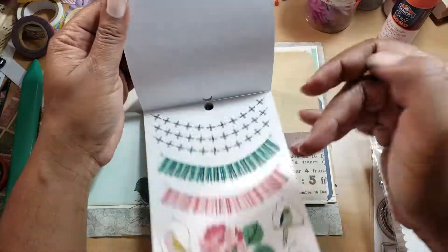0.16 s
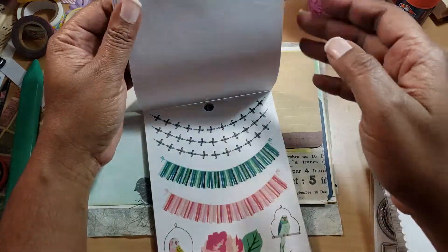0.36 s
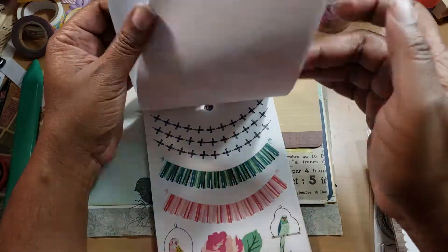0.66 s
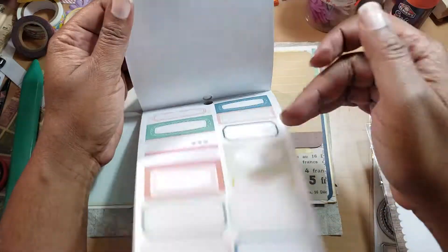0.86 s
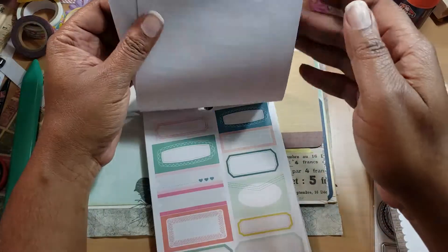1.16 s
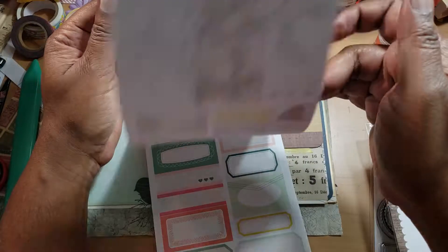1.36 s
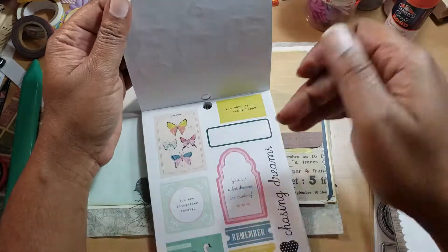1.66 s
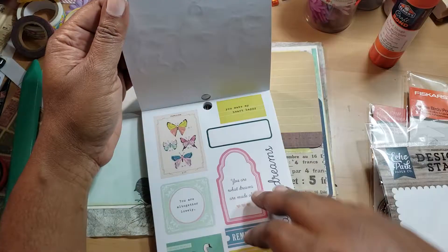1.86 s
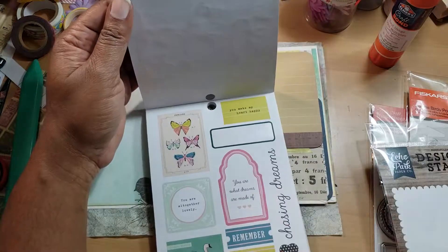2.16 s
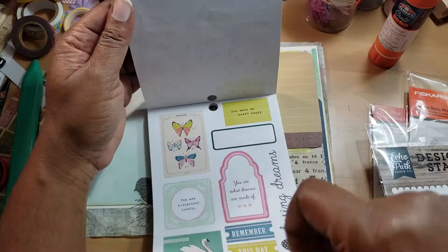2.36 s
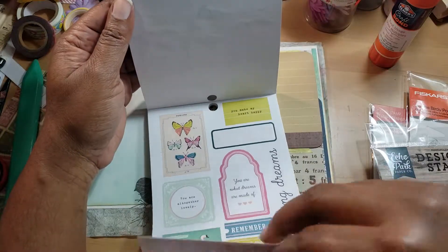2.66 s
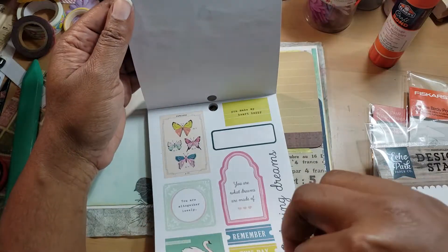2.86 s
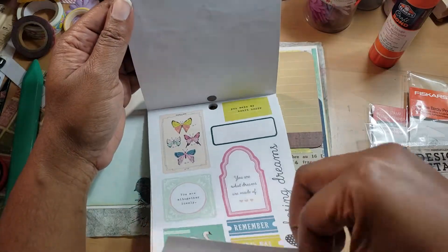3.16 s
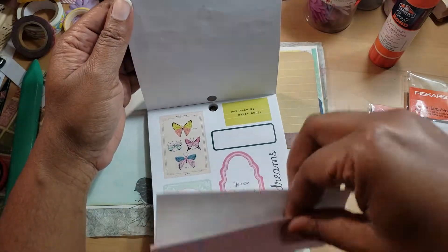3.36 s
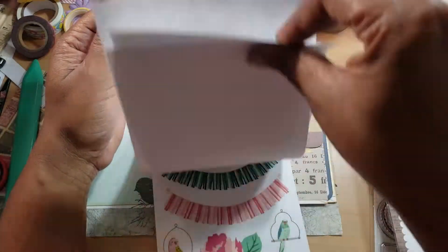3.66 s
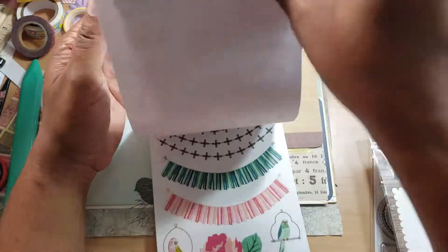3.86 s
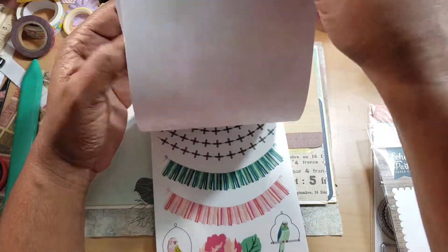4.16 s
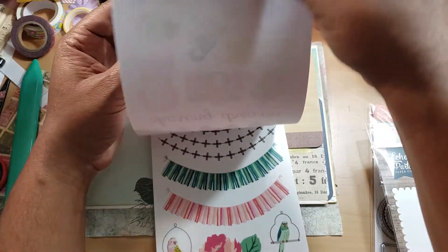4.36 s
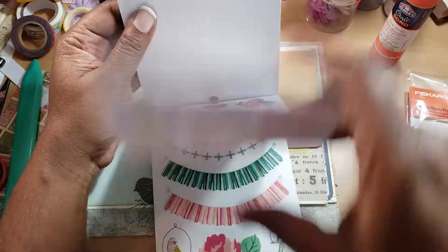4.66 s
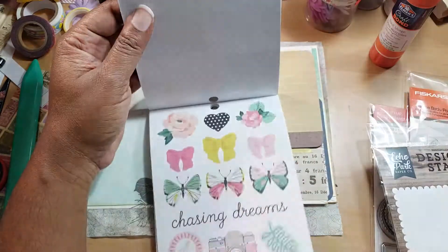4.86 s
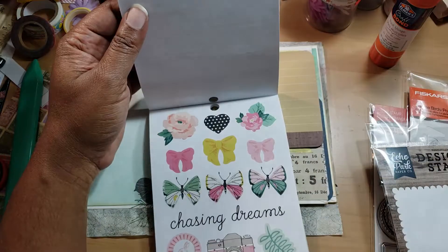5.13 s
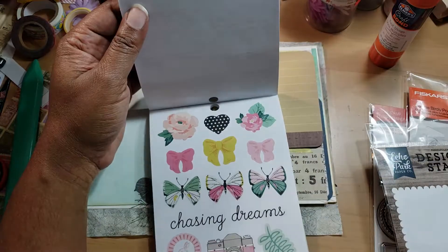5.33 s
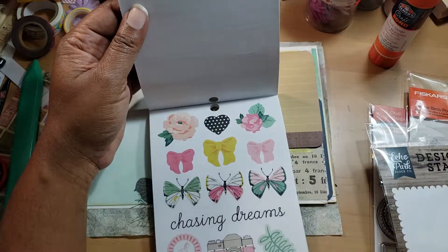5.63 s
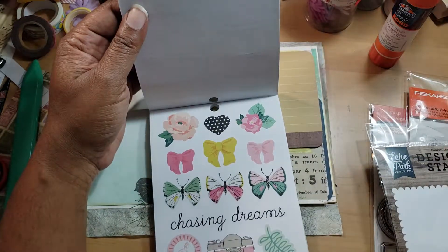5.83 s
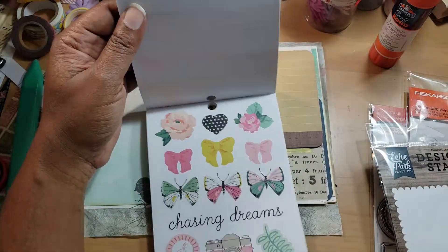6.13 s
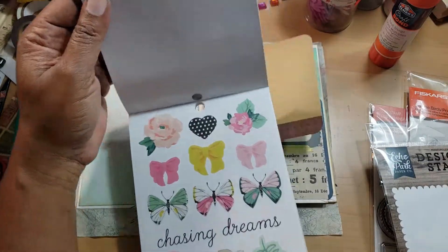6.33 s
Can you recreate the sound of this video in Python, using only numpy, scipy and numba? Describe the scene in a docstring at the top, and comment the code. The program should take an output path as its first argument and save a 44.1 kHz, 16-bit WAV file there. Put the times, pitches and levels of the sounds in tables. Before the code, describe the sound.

In a small room with a steady low hum, someone leafs through a pad of sticker sheets. Brief papery swishes and ticks come first, followed by louder rubbing and crisp snaps as a sheet buckles. Another page rustles over and pats down, and the handling thins to a few light brushes. The paper sounds close and fairly dry, with a faint microphone hiss on the left.

```python
"""Pages of a sticker book are flipped by hand at a craft desk, close to two microphones.
Sheets slip from under a thumb, are rubbed apart, lifted and turned: stick-slip friction of the fibres
drives the resonances of the paper and the air beneath it. Sheets snap as they buckle and pat down on
the pad. A motor hums in the small, rumbling room, and a thin microphone hiss sits on the left."""
import sys
import numpy as np
from scipy import signal
from scipy.fft import rfft, irfft, next_fast_len
from scipy.io import wavfile
from numba import njit

SR = 44100
rng = np.random.default_rng(int(sys.argv[2]) if len(sys.argv) > 2 else 0)


def log_audio(samples):
    """Write samples as a 16-bit WAV file to the path given in sys.argv[1]."""
    # one column per channel
    frames = np.atleast_2d(samples).T
    # limit to full scale, then quantise
    limited = np.clip(frames, -1, 1)
    pcm = np.round(limited * 32767).astype(np.int16)
    wavfile.write(sys.argv[1], SR, pcm)


N = 286517

# Motor turning rate, mains and their octaves: pitch_hz
HUM_PITCHES = [56.85, 59.3, 113.7, 119.95]
# Strength of those tones: rms_db
HUM_LEVELS = [-53, -64.5, -62.5, -66]
# Spectra of room rumble and microphone hiss: frequency_hz, relative_density_db
RUMBLE_SPECTRUM = [(20, -19), (35, -19), (43, 0), (60, 1), (80, 2.5), (100, 3), (122, -4.5), (140, -10.5),
                   (200, -17.5), (300, -20), (450, -36), (900, -39), (2000, -52.5)]
LEFT_HISS_SPECTRUM = [(300, -29), (550, -19), (850, -18), (1200, -17), (1600, -12), (2100, -2.5), (2500, 0),
                      (2950, -4.5), (3500, -19.5), (5000, -27), (6400, -15.5), (7800, -33), (10000, -92)]
EVEN_HISS_SPECTRUM = [(300, 4), (1000, -2), (3000, -2.5), (5500, -6.5), (8700, -17), (10000, -12),
                      (11500, -2.5), (16000, -3)]
# Likeness of the two microphone signals: frequency_hz, coherence (capped at 1 in use)
RUMBLE_COHERENCE = [(60, 1), (130, 1), (280, 0.55), (700, 0.34)]
ROOM_COHERENCE = [(300, 0.87), (1000, 0), (2500, 0)]
PAPER_COHERENCE = [(300, 0.8), (1200, 1.2), (2200, 0.7), (4500, 0.14), (8000, 0.1), (16000, 0)]
# Level difference between the microphones: frequency_hz, left_minus_right_db
RUMBLE_PAN = [(60, -2), (130, -5.5), (280, -2.5), (500, -0.5)]
PAPER_PAN = [(300, 0), (600, 4), (1300, 0), (2000, 3.5), (3000, 4), (4500, 1), (6500, -4), (9000, -6.5),
             (12000, -15.5), (16000, -7)]
# Peaks and dips that the desk top gives to the rubbing: centre_hz, width_hz, gain_db
DESK_RESPONSE = [(960, 29, -2), (1320, 41, 1), (1375, 240, -1), (1598, 17, -4), (2430, 560, -2),
                 (2796, 44, 1), (2937, 30, -1.5), (3460, 22, -2), (4000, 72, 0.5), (4860, 36, 2),
                 (5500, 72, -0.5)]
# Pats of page and fingers on the pad: start_s, relative_level_db, centre_hz, thud_offset_db, t60_s
PAD_IMPACTS = [(0.048, -52, 650, -8, 0.042), (0.082, -57.5, 700, -1, 0.09), (0.308, -68, 490, 3.5, 0.042),
               (0.942, -57, 597, -21, 0.07), (0.953, -53, 527, -26, 0.093),
               (1.141, -45.5, 1390, -10.5, 0.1), (1.253, -54.5, 1340, -21, 0.15),
               (1.595, -57.5, 536, -13, 0.078), (1.629, -61, 680, 0.5, 0.059),
               (2.649, -53.5, 600, -12, .12), (3.033, -43.5, 1140, -18, 0.053),
               (3.054, -45.5, 990, -40, 0.08), (4.176, -52.5, 1400, -10, 0.07),
               (4.689, -54, 1230, -12, 0.073), (4.704, -50, 1130, -8, 0.061),
               (4.731, -48.5, 1140, -14, 0.11), (4.794, -55, 1160, -17, 0.042),
               (4.832, -47.5, 576, -11.5, 0.062), (4.937, -67, 544, -7, 0.07),
               (5.007, -61, 1400, -8, 0.062)]
# A sheet buckles or leaves a finger: start_s, relative_level_db, centre_hz, width_ratio, treble_db
SHEET_SNAPS = [(0.077, -38, 2280, 0.58, -4), (0.788, -33, 2660, 0.64, -7), (1.0444, -28, 2200, 1.3, -8),
               (1.405, -37, 3000, .8, -10), (1.69, -48.5, 2180, 0.59, -20), (2.606, -22.5, 1800, .3, -21),
               (2.608, -22.5, 1050, .7, -24), (2.648, -29, 1150, .42, -29), (2.871, -42, 1660, 0.45, -21),
               (2.899, -32.5, 1650, .8, -22), (3.037, -31, 1880, 0.76, -25),
               (3.051, -26.5, 1790, 0.14, -24), (3.056, -30, 1110, 0.44, -24), (3.816, -45, 2600, 1.4, -11),
               (4.104, -36, 1760, 0.34, -22), (4.218, -38, 2130, .6, -19), (4.457, -39, 4570, .9, -24),
               (4.69, -47.5, 1150, .9, -18), (4.736, -37, 1190, 0.5, -12), (4.828, -42.5, 1400, .8, -20)]
# Spectrum of the sheet in each grip: frequency_hz, relative_density_db
SLIP_SPECTRUM = [(290, -34), (500, -18.5), (613, -19), (678, -16), (784, -14.5), (1190, -19), (1320, -0.5),
                 (1480, -3), (1770, -5.5), (2100, 1.5), (3200, -7), (4470, -6), (8580, -16), (12100, -12),
                 (16000, -9.5)]
SEPARATE_SPECTRUM = [(240, -62), (400, -26.5), (636, -16.5), (777, -7), (935, -7.5), (994, -0.5),
                     (1440, -6.5), (1730, -1), (2470, -7.5), (3020, -8), (4510, -9.5), (4950, -9),
                     (9610, -23), (11900, -21), (16000, -21)]
TUG_SPECTRUM = [(180, -45), (300, -23), (502, -24.5), (555, -23), (689, -13), (1120, -1), (1480, -4),
                (1870, -10), (2650, -1), (3190, -1.5), (4670, -4.5), (5800, -4), (7690, -15.5),
                (12500, -19.5), (16000, -18)]
LIFT_SPECTRUM = [(290, -71), (500, -42), (1020, -4.5), (1140, -10), (1230, -6.5), (2040, -3), (2330, -8.5),
                 (2500, -8.5), (3250, -7), (5020, 0.5), (5630, -3), (6420, -5.5), (9360, -18.5),
                 (11600, -17.5), (16000, -19)]
TURN_SPECTRUM = [(290, -54), (500, -29.5), (698, -21.5), (988, -11), (1280, -7.5), (1820, -4.5), (2160, -1),
                 (2360, -5.5), (3390, -8), (4470, -8.5), (5470, -12.5), (9630, -23.5), (11500, -18),
                 (15100, -20), (16000, -18.5)]
BRUSH_SPECTRUM = [(350, -47), (600, -11), (1230, -12.5), (1450, 3), (1590, -4), (2500, 4.5), (3890, -4.5),
                  (5950, -7), (9490, -16.5), (12300, -11), (16000, -10)]
# Resonances of the bent sheet and the air under it: centre_hz, width_hz, gain_db
SLIP_RESONANCES = [(1460, 57, 6.5), (2040, 440, -3)]
SEPARATE_RESONANCES = [(1280, 110, 4), (1750, 160, 6.6), (1930, 90, 3.5)]
TUG_RESONANCES = [(555, 360, 3), (1110, 220, -3), (1660, 80, 10), (1870, 116, 13), (2600, 710, -9.5)]
LIFT_RESONANCES = [(1020, 290, 3), (1680, 280, 2.3)]
TURN_RESONANCES = [(960, 110, 4), (1560, 120, 3.3), (1910, 220, 2.8), (3370, 98, 4.2)]
# Strokes of paper on skin or paper: grip, start_s, attack_s, hold_s, release_t60_s,
# sheet_db, rasp_db, hiss_db, air_pocket_hz, pocket_over_sheet_db
HAND_STROKES = [ ("slip", 0.0, 0.0032, 0.0073, .19, -58, -48.5, -44.5, 2300, -3),
                ("slip", .055, .02, .03, .35, -73, -64.5, -58.5, 2200, -8),
                ("slip", .422, .06, .005, .5, -55.5, -54.5, -60.5, 1490, 1),
                ("slip", 0.528, .09, .16, 0.27, -58.5, -63.5, -64, 1410, -2.2),
                ("slip", .65, .07, 0.016, .31, -61, -50, -47.5, 1470, -2),
                ("slip", 0.928, .07, 0.032, 0.11, -58.5, -76, -79, 1950, 2),
                ("slip", 1.038, 0.014, 0.064, .45, -55, -59.5, -62, 2100, 1),
                ("slip", 1.098, 0.049, .04, .2, -57, -57, -58, 1430, -1),
                ("slip", 1.17, .05, .13, .2, -59, -64, -75, 1440, 4),
                ("slip", 1.23, .05, .01, .25, -67, -59.5, -61, 1450, 0),
                ("slip", 1.3176, 0.039, .015, .33, -62, -52.5, -47.5, 1370, -6),
                ("brush", 2.008, .004, .025, .35, -90, -78, -72, 2000, -10),
                ("brush", 2.06, .085, .10, .09, -90, -86, -59.5, 2000, -10),
                ("separate", 2.30, .008, 0.073, .2, -76, -73, -64.5, 1900, 0),
                ("separate", 2.354, .105, .025, .45, -46.5, -43.3, -53.5, 1800, 0),
                ("separate", 2.43, .06, .11, .08, -46, -48, -62, 1200, -14),
                ("separate", 2.645, 0.023, .03, .45, -52.5, -55, -61, 1230, -12),
                ("separate", 2.75, 0.018, .02, 0.56, -59.5, -63, -68, 1620, 5),
                ("separate", 2.835, .035, .015, .4, -60.5, -65, -68, 1800, 2),
                ("separate", 2.925, .025, .04, .1, -59, -70, -79, 1950, 8),
                ("tug", 3.002, .012, .028, .35, -52, -43.5, -54.5, 1950, -10),
                ("tug", 3.015, .033, 0.0038, .27, -39.5, -45, -63, 1820, 2),
                ("tug", 3.06, .035, .025, .62, -55, -59.5, -58, 2000, -10),
                ("tug", 3.18, 0.044, .008, .2, -53, -54.5, -57, 2050, -12),
                ("tug", 3.25, 0.039, .15, .14, -62.5, -61, -66.5, 1530, -1),
                ("lift", 3.535, .06, .015, .27, -50.5, -49, -54, 1170, -11),
                ("lift", 3.61, .045, .015, .12, -50, -53, -54, 1150, -11),
                ("lift", 3.72, .03, 0.011, .15, -67, -65, -70, 1300, -8),
                ("turn", 3.805, .015, 0.044, .8, -60.5, -64.5, -69.5, 1470, -3),
                ("turn", 3.95, .06, .01, .2, -72, -66, -71, 1950, -5),
                ("turn", 4.025, .025, .025, 0.22, -57.5, -62.5, -62.5, 1900, 8),
                ("turn", 4.092, .01, .04, .33, -45.5, -47, -53.5, 1770, 5.7),
                ("turn", 4.17, .05, .015, .3, -47, -51.5, -62, 1930, -2),
                ("turn", 4.265, 0.036, .09, .2, -49.5, -51.5, -58.5, 2100, -20),
                ("turn", 4.35, .04, .02, .36, -64, -56.5, -57.5, 2100, -15),
                ("turn", 4.48, .03, .005, .17, -70, -70, -66, 1800, -10),
                ("brush", 4.688, .01, .02, .2, -80, -78, -73, 1900, 0),
                ("brush", 4.725, .015, 0.038, 0.23, -63.5, -62.5, -63.5, 1910, 4),
                ("brush", 4.825, 0.014, 0.028, .3, -70, -74, -66.5, 1940, 0),
                ("brush", 4.925, 0.027, .03, .4, -62, -72, -67.5, 1950, 2),
                ("brush", 4.96, 0.048, 0.018, .5, -69, -62, -73, 2500, -9),
                ("brush", 5.055, .05, 0.067, .4, -72, -66, -65.5, 2600, -9),
                ("brush", 5.295, .095, 0.013, .17, -65.5, -74, -74, 1900, -3),
                ("brush", 6.205, 0.034, 0.019, .35, -67.5, -63, -66.5, 2200, -8)]

SPEED_EXPONENTS = 1.014, 1.04, .92   # sheet, rasp and hiss grow as these powers of sliding speed
# Edge and air pocket start sharp and settle as the free length of the page grows:
# share above the final pitch, time constant as a share of the attack
EDGE_SHARP, EDGE_SETTLE = 1.08, .4
POCKET_SHARP, POCKET_SETTLE = .17, .57


def from_db(db):
    """Amplitude ratio of a level in decibels."""
    return 10 ** (np.asarray(db) / 20)


def unit_rms(x):
    """Normalisation: the mean of the channels gets an rms of 1."""
    return x / np.sqrt(np.mean(np.atleast_2d(x).mean(axis=0) ** 2) + 1e-20)


def bins():
    """Frequencies of the Fourier transform in Hz, floored at 1."""
    return np.maximum(np.fft.rfftfreq(next_fast_len(N), 1 / SR), 1)


def at_hz(points):
    """Interpolation of a table along log frequency."""
    hz, value = np.transpose(points)
    return np.interp(np.log(bins()), np.log(hz), value)


def spectrum_of(x):
    """Fourier transform of a whole track."""
    return rfft(x, next_fast_len(N))


def track_of(spectrum):
    """Inverse Fourier transform, N samples long."""
    return irfft(spectrum, next_fast_len(N))[..., :N]


def white_pair():
    """Two uncorrelated white noises."""
    return rng.standard_normal((2, N))


def drift(rate_hz):
    """Slow random fluctuation: low-passed noise of rms 1."""
    return unit_rms(track_of(spectrum_of(rng.standard_normal(N)) / (1 + (bins() / rate_hz) ** 2)))


def stereo_spectrum(pair, coherence, pan):
    """Partial coherence: two unrelated signals mix as sum and difference at the microphones."""
    mid, side = spectrum_of(pair)
    alike = np.clip(at_hz(coherence), -1, 1)
    sign = np.array([[1], [-1]])
    return (np.sqrt(1 + alike) * mid + sign * np.sqrt(1 - alike) * side) * from_db(sign * at_hz(pan) / 2)


def band(hz, width_hz):
    """Response of a damped oscillator, 1 at resonance."""
    return 1 / (1 + 1j * (bins() ** 2 - hz ** 2) / (bins() * width_hz))


def modal_response(modes):
    """Superposed resonances put peaks and dips in a flat response."""
    return 1 + sum((from_db(db) - 1) * band(hz, width_hz) for hz, width_hz, db in modes)


def burst(start_s, t60_s, rise_s):
    """Envelope of an impulsive excitation: quick rise, exponential decay, peak 1."""
    age = np.maximum(np.arange(N) / SR - start_s, 0)
    shape = (1 - np.exp(-age / rise_s)) * from_db(-60 * np.minimum(age / max(t60_s, .005), 3))
    return shape / (shape.max() + 1e-12)


def motor_hum():
    """Motor and mains tones lie close in frequency, so their sum beats."""
    t = np.arange(N) / SR
    return sum(from_db(db) * np.sqrt(2) * np.sin(2 * np.pi * (hz * t + rng.random()))
               for hz, db in zip(HUM_PITCHES, HUM_LEVELS))


def air_rumble(level_db):
    """Low noise of the room air, coherent at long wavelengths."""
    noise = stereo_spectrum(white_pair(), RUMBLE_COHERENCE, RUMBLE_PAN)
    return from_db(level_db) * unit_rms(track_of(noise * from_db(at_hz(RUMBLE_SPECTRUM))))


def microphone_hiss(left_db, even_db):
    """Self-noise: a thin band on the left over an uncorrelated floor in both channels."""
    left = track_of(spectrum_of(rng.standard_normal(N)) * from_db(at_hz(LEFT_HISS_SPECTRUM)))
    even = track_of(spectrum_of(white_pair()) * from_db(at_hz(EVEN_HISS_SPECTRUM)))
    return from_db(left_db) * np.outer([1, 0], unit_rms(left)) + from_db(even_db) * unit_rms(even)


def reverberation(x, t60_s, lowpass_hz):
    """Scattering from desk and walls: convolution with a short, dull tail of noise."""
    scatter = track_of(stereo_spectrum(white_pair(), ROOM_COHERENCE, pan=[(1000, 0)]))
    tail = scatter * burst(0.0017, t60_s, rise_s=0.00091)
    tail /= np.sqrt(np.sum(tail[0] ** 2))
    tail = track_of(spectrum_of(tail) / (1 + 1j * bins() / lowpass_hz))
    return signal.fftconvolve(x, tail[:, :SR // 2], axes=1)[:, :N]


def on_desk(x):
    """The desk top colours the rubbing as a linear filter."""
    return track_of(spectrum_of(x) * modal_response(DESK_RESPONSE))


def pats(flap_db, thud_db, width_ratio, thud_hz):
    """Damped impact: a soft touch flaps the top sheet and thuds in the pad below."""
    noise = stereo_spectrum(white_pair(), PAPER_COHERENCE, PAPER_PAN)
    thud = unit_rms(track_of(noise * band(thud_hz, 224) ** 2))
    out = 0
    for start_s, db, hz, offset_db, t60_s in PAD_IMPACTS:
        flap = unit_rms(track_of(noise * band(hz, width_ratio * hz) * band(455, 1020) ** 2))
        pat = from_db(flap_db) * flap + from_db(thud_db + offset_db) * thud
        out += from_db(db) * pat * burst(start_s, t60_s, rise_s=.003)
    return out


def snaps(flick_db, ring_db, crack_db, ring_t60_s, crack_t60_s, rebound_s):
    """Buckling: a sheet flicks over and rebounds, with a bright crack and a short papery ring."""
    noise = stereo_spectrum(white_pair(), PAPER_COHERENCE, PAPER_PAN)
    treble = unit_rms(track_of(noise * band(7500, 9000) ** 2))
    rebound = 1 + .5 * np.exp(-2j * np.pi * bins() * rebound_s)
    out = 0
    for start_s, db, hz, width_ratio, treble_db in SHEET_SNAPS:
        body = band(hz, width_ratio * hz) * band(hz, 3 * hz)
        flick = track_of(body * np.exp(-2j * np.pi * bins() * start_s) * rebound)
        flick *= from_db(flick_db) / np.abs(flick).max()
        ring = from_db(ring_db) * unit_rms(track_of(noise * body))
        ring *= burst(start_s, ring_t60_s, rise_s=.00022)
        crack = from_db(crack_db + treble_db) * treble * burst(start_s, crack_t60_s, rise_s=.0002)
        out += from_db(db) * (flick + ring + crack)
    return out


def friction(catches_per_s, spread_db, smooth_db):
    """Stick-slip spectrum: fibres catch and let go in tiny, uneven clicks over a smooth hiss."""
    caught = rng.random(N) < catches_per_s * from_db(3 * drift(40)) / SR
    sizes = caught * from_db(spread_db * np.minimum(rng.exponential(1, N), 4))
    clicks = unit_rms(sizes * rng.choice([-1, 1], (2, N)))
    return stereo_spectrum(clicks + from_db(smooth_db) * white_pair(), PAPER_COHERENCE, PAPER_PAN)


def reflected(x, delay_s, share):
    """Interference with a reflection of changing delay makes a moving comb filter."""
    n = np.arange(N)
    return x + share * np.array([np.interp(n - delay_s * SR, n, side) for side in x])


@njit
def resonator(x, angle, radius):
    """Two-pole resonance whose centre follows angle, in radians per sample."""
    y = np.zeros(len(x))
    for i in range(2, len(x)):
        y[i] = x[i] - x[i - 2] + 2 * radius * np.cos(angle[i]) * y[i - 1] - radius * radius * y[i - 2]
    return y


def gliding(drive, hz, width_hz):
    """Forced vibration of a resonance whose pitch moves."""
    angle = 2 * np.pi * np.minimum(hz, SR / 3) / SR
    radius = np.exp(-np.pi * width_hz / SR)
    return unit_rms(np.array([resonator(side, angle, radius) for side in drive]))


def blend(noise, resonance, strength):
    """Uncorrelated signals add in power, so this mix keeps a constant level."""
    return (noise + strength * resonance) / np.sqrt(1 + strength ** 2)


def stroke_speed(age, attack_s, hold_s, t60_s, ease_s=.005, sag_db_per_s=22):
    """Relative sliding speed: the hand eases in, slows a little, then stops exponentially."""
    eased_age = ease_s * np.logaddexp(0, age / ease_s)
    rise = np.minimum(eased_age / max(attack_s, .002), 1) ** 1.04
    held = np.clip(age - attack_s, 0, hold_s)
    released = np.maximum(age - attack_s - hold_s, 0)
    return rise * from_db(-sag_db_per_s * held - 60 * released / max(t60_s, .02))


def stroke_controls(grip):
    """Overlapping strokes add in power; the louder one leads the edge and pocket resonances."""
    t = np.arange(0, N / SR, .001)
    power, edge, pocket, strength = [], [], [], []
    for name, start_s, attack_s, hold_s, t60_s, *layers_db, pocket_hz, pocket_db in HAND_STROKES:
        if name == grip:
            age = np.maximum(t - start_s, 0)
            speed = stroke_speed(t - start_s, attack_s, hold_s, t60_s)
            power.append([(from_db(db) * speed ** k) ** 2 for db, k in zip(layers_db, SPEED_EXPONENTS)])
            edge.append(1 + EDGE_SHARP * np.exp(-age / (EDGE_SETTLE * attack_s)))
            pocket.append(pocket_hz * (1 + POCKET_SHARP * np.exp(-age / (POCKET_SETTLE * attack_s))))
            strength.append(np.full(len(t), from_db(pocket_db)))
    gains = np.sqrt(np.sum(power, axis=0))
    sheet_power, rasp_power, _ = np.swapaxes(power, 0, 1) + 1e-20
    weighted = (edge, rasp_power ** 2), (pocket, sheet_power), (strength, sheet_power)
    averages = [np.average(value, axis=0, weights=weight) for value, weight in weighted]
    return [np.interp(np.arange(N) / SR, t, control) for control in [*gains, *averages]]


def slide(rub, catching, grip, spectrum, modes, edge_hz, edge_db, judder_db, pan_db):
    """Friction forces the sheet's resonances, the rasp of its edge and the hiss of its fibres."""
    sheet_gain, rasp_gain, hiss_gain, edge_ratio, pocket_hz, pocket_strength = stroke_controls(grip)
    coloured = rub * from_db(at_hz(spectrum)) * modal_response(modes)
    below_rasp = 1 / (1 + (bins() / 2600) ** 10)
    below_hiss = 1 / (1 + (bins() / 7500) ** 10)
    power_shares = below_rasp, below_hiss - below_rasp, 1 - below_hiss
    sheet, rasp, hiss = [unit_rms(track_of(coloured * np.sqrt(np.abs(share)))) for share in power_shares]
    # the page below mirrors rasp and hiss across an unsteady gap: ripples that glide with the edge
    glide_hz = edge_hz * edge_ratio
    delay_s = 4 / glide_hz * (1 + .035 * drift(9))
    rasp, hiss = [unit_rms(reflected(layer, delay_s, share=.42)) for layer in (rasp, hiss)]
    rasp = blend(rasp, gliding(catching, glide_hz, width_hz=250), from_db(edge_db))
    sheet = blend(sheet, gliding(catching, pocket_hz, width_hz=165), pocket_strength)
    sound = sheet_gain * sheet + rasp_gain * rasp + hiss_gain * hiss
    judder = from_db(judder_db * drift(57))   # the finger never slides evenly
    return sound * judder * from_db(np.array([[pan_db], [-pan_db]]) / 2)


def pages():
    """Source and filter: the same friction excites the sheet, which each grip colours differently."""
    rub = friction(catches_per_s=3800, spread_db=2.0, smooth_db=3.5)
    catching = friction(catches_per_s=2000, spread_db=2.5, smooth_db=0.0)
    catching = track_of(catching * band(2700, 5000) ** 2)
    return (slide(rub, catching, "slip", SLIP_SPECTRUM, SLIP_RESONANCES,
                  edge_hz=3680, edge_db=-11, judder_db=0.6, pan_db=-1.5)
            + slide(rub, catching, "separate", SEPARATE_SPECTRUM, SEPARATE_RESONANCES,
                    edge_hz=2830, edge_db=1, judder_db=1.26, pan_db=-1.1)
            + slide(rub, catching, "tug", TUG_SPECTRUM, TUG_RESONANCES,
                    edge_hz=3100, edge_db=-5, judder_db=0.7, pan_db=-0.8)
            + slide(rub, catching, "lift", LIFT_SPECTRUM, LIFT_RESONANCES,
                    edge_hz=4750, edge_db=-2, judder_db=0.4, pan_db=0.2)
            + slide(rub, catching, "turn", TURN_SPECTRUM, TURN_RESONANCES,
                    edge_hz=3200, edge_db=-9, judder_db=0.67, pan_db=-0.6)
            + slide(rub, catching, "brush", BRUSH_SPECTRUM, [],
                    edge_hz=3500, edge_db=-6, judder_db=1.1, pan_db=0.0))


def scene():
    """Superposition of the paper's direct sound, its reverberation and the steady background."""
    paper = on_desk(pages())
    paper += snaps(flick_db=-6.5, ring_db=-13, crack_db=-13,
                   ring_t60_s=0.025, crack_t60_s=0.013, rebound_s=0.0008)
    paper += pats(flap_db=-9, thud_db=0.5, width_ratio=0.95, thud_hz=275)
    room = from_db(-5.5) * reverberation(paper, t60_s=0.18, lowpass_hz=5800)
    background = motor_hum() + air_rumble(level_db=-56.9) + microphone_hiss(left_db=-63, even_db=-81)
    return paper + room + background


def record(dry):
    """An elliptic low-pass filter cuts the highest treble steeply."""
    cutoff_hz = 15850
    return signal.sosfilt(signal.ellip(12, .1, 80, cutoff_hz, fs=SR, output="sos"), dry)


dry = scene()
out = record(dry)
log_audio(out)
```